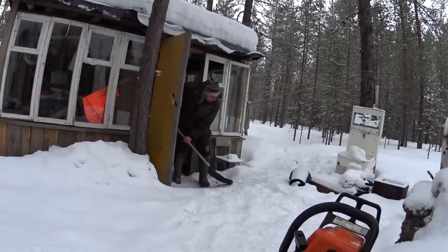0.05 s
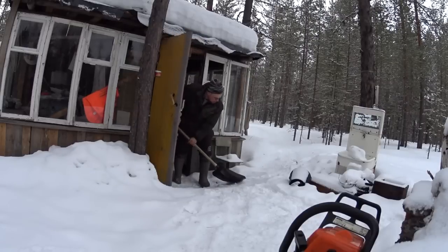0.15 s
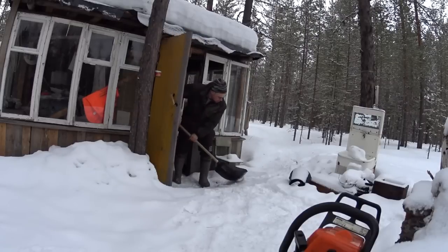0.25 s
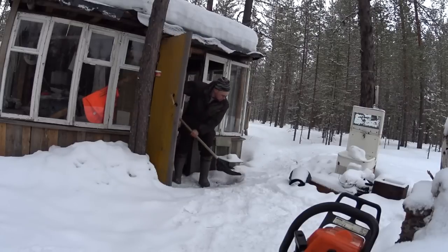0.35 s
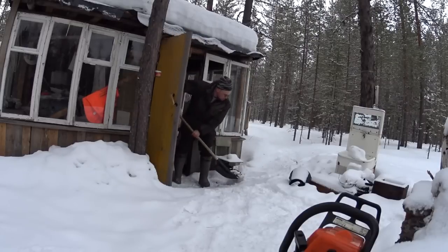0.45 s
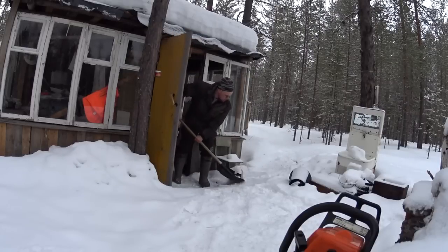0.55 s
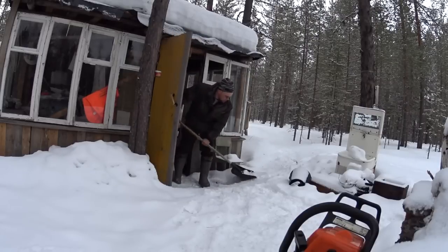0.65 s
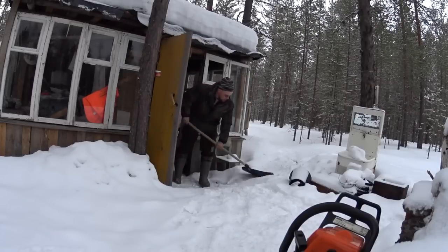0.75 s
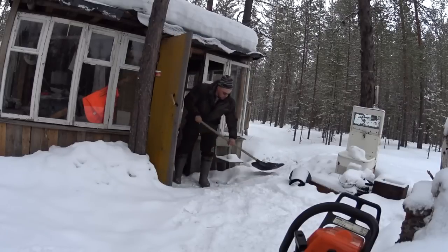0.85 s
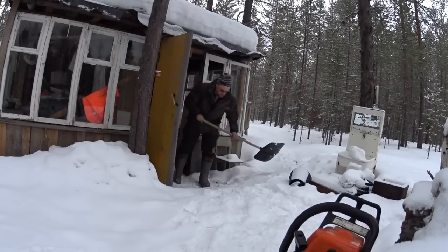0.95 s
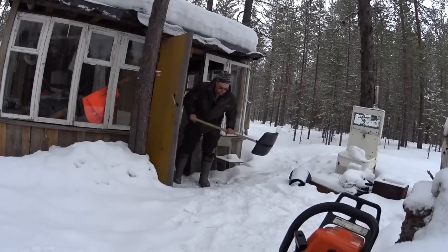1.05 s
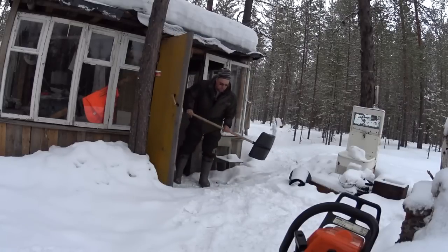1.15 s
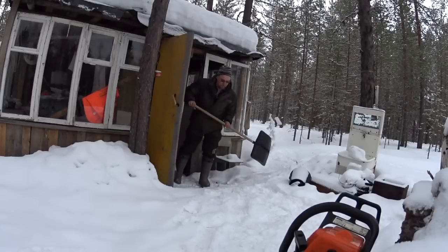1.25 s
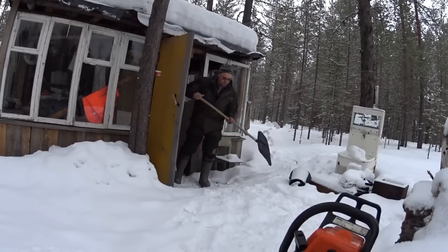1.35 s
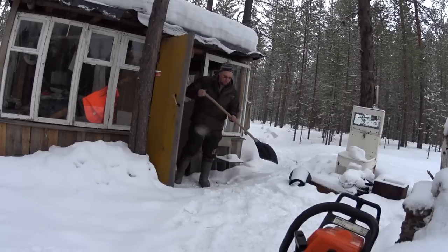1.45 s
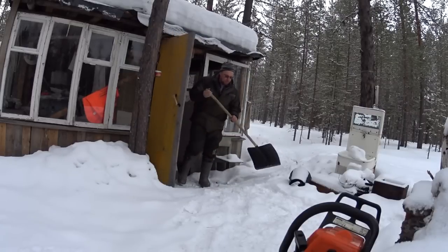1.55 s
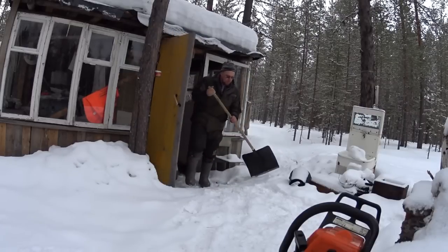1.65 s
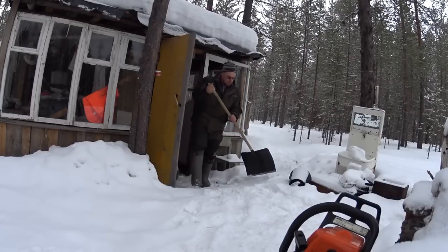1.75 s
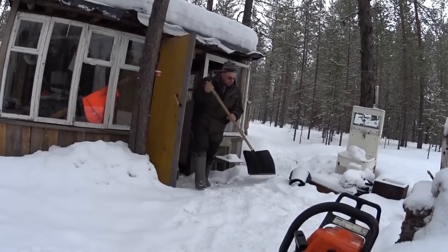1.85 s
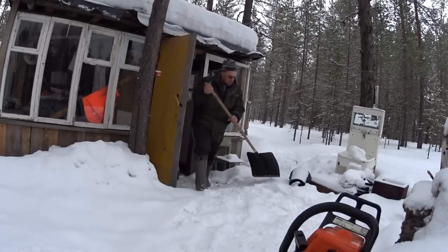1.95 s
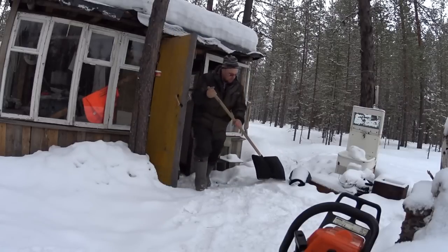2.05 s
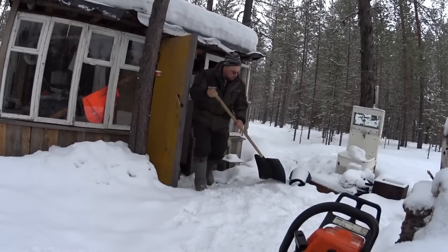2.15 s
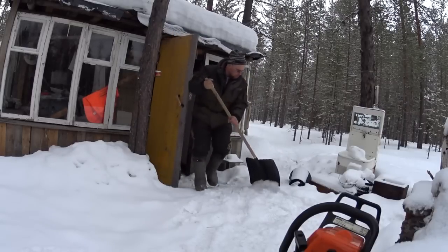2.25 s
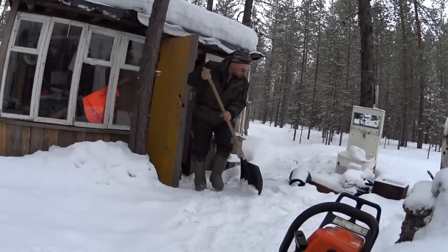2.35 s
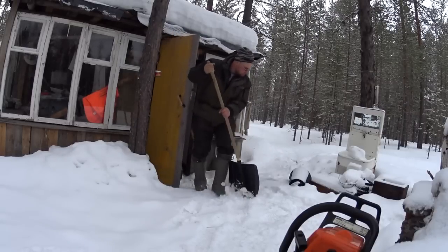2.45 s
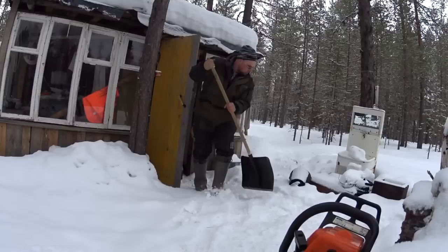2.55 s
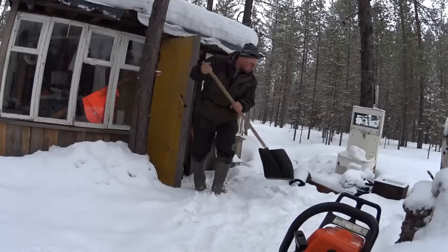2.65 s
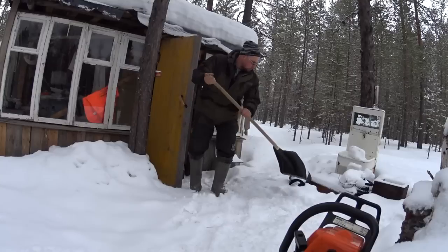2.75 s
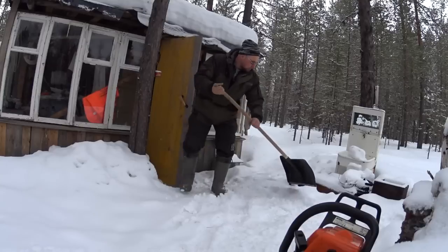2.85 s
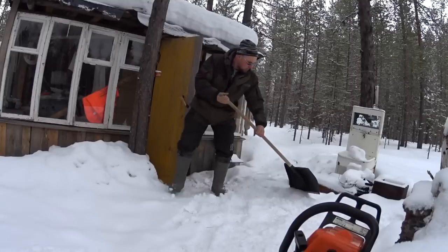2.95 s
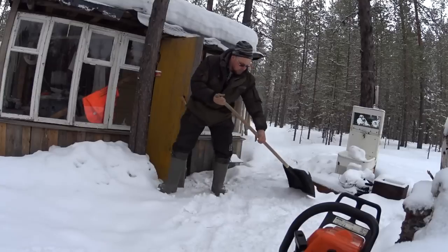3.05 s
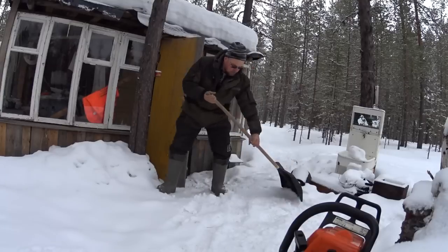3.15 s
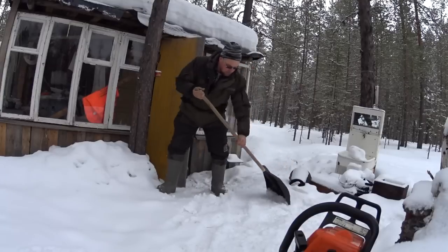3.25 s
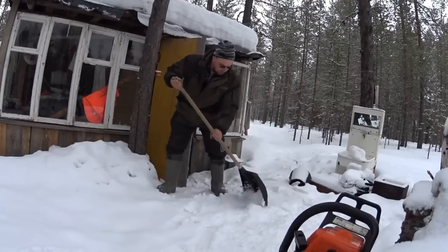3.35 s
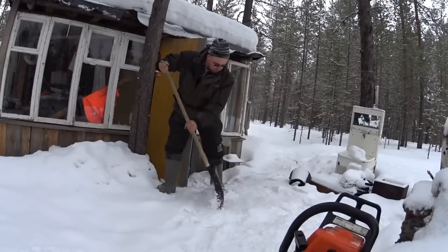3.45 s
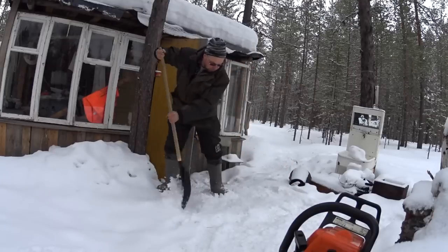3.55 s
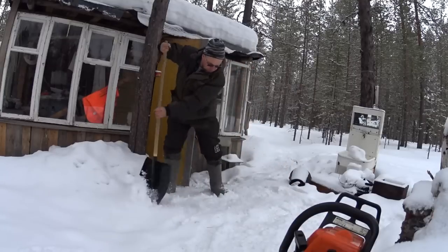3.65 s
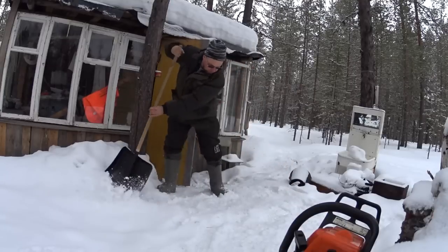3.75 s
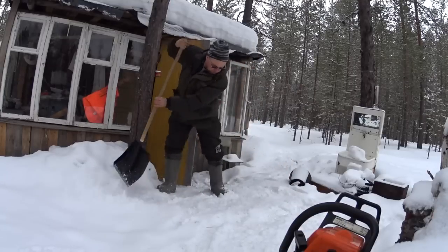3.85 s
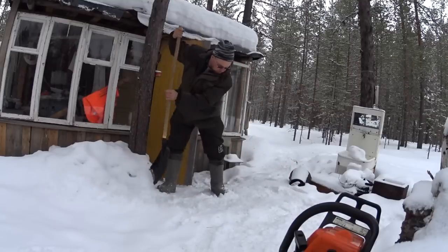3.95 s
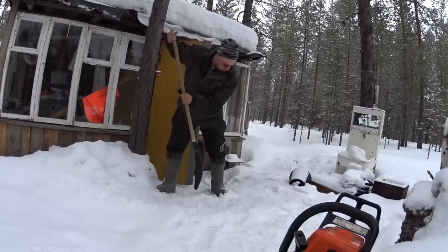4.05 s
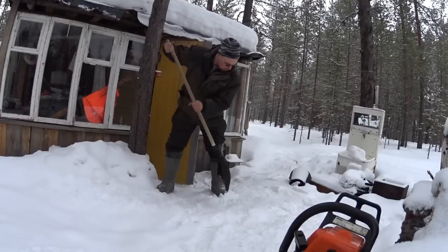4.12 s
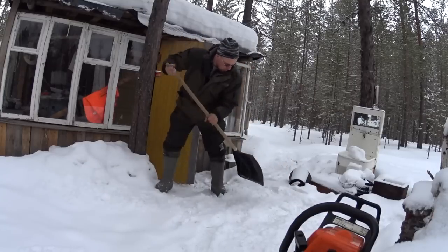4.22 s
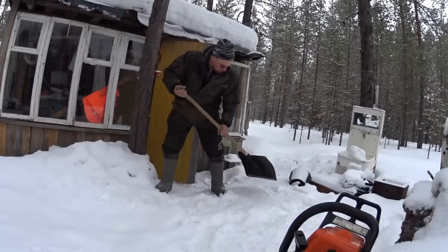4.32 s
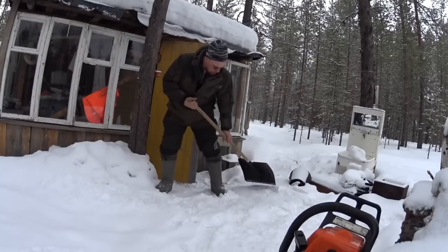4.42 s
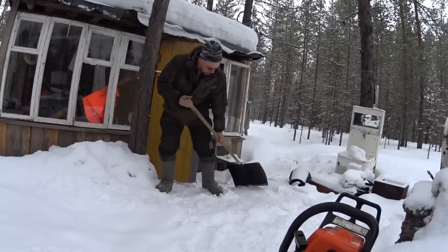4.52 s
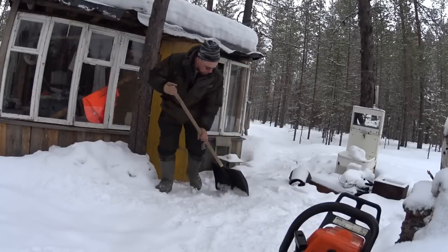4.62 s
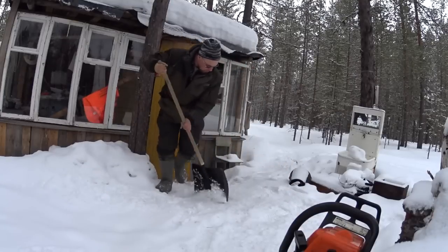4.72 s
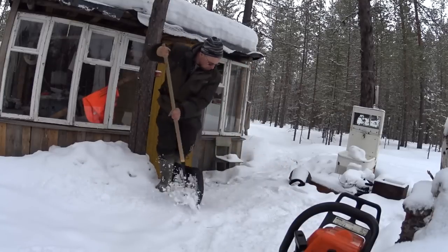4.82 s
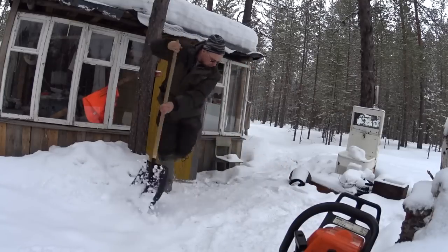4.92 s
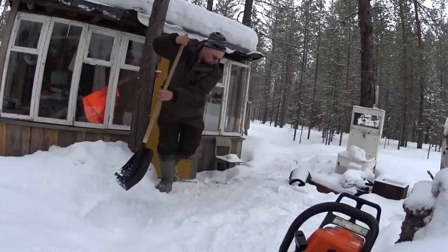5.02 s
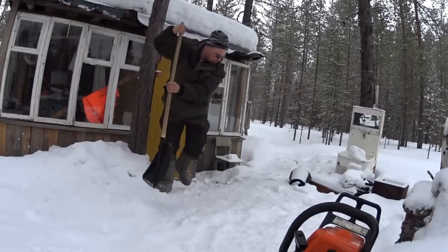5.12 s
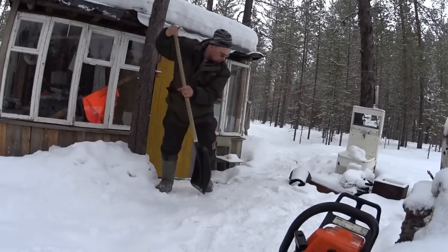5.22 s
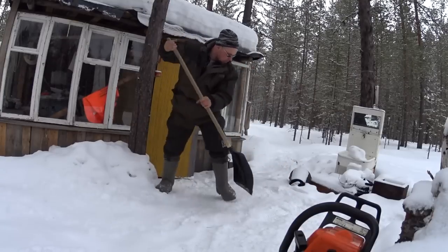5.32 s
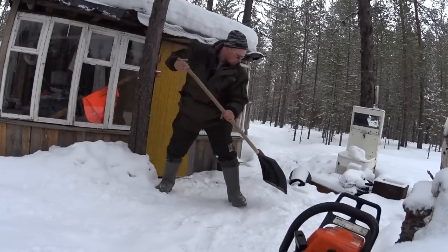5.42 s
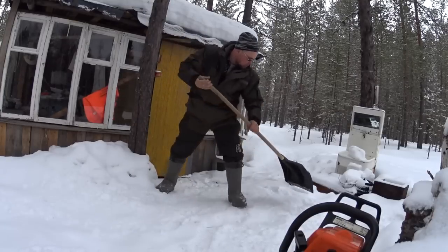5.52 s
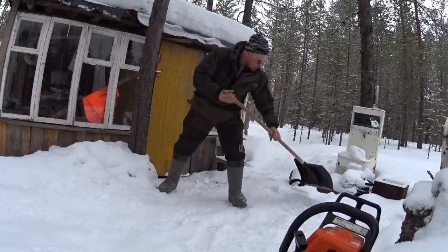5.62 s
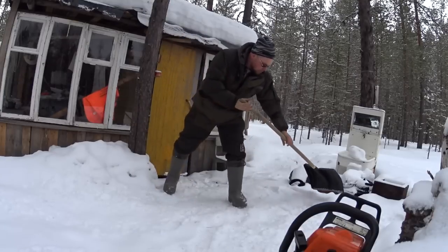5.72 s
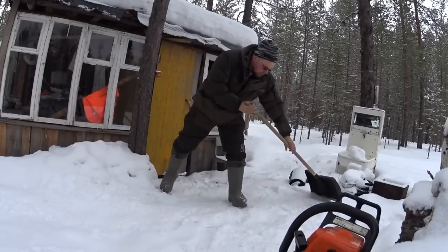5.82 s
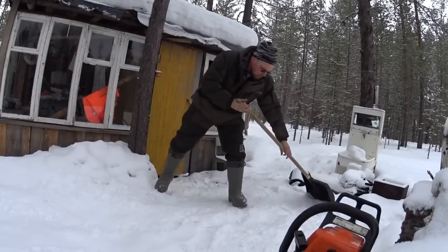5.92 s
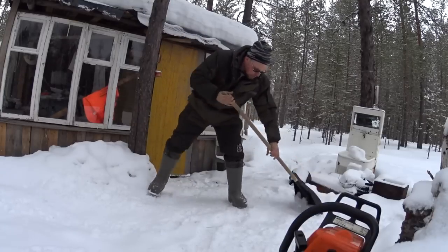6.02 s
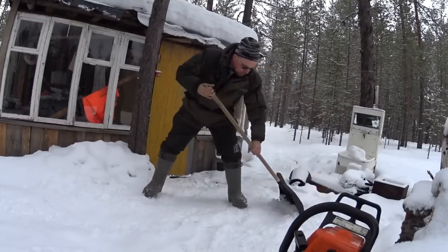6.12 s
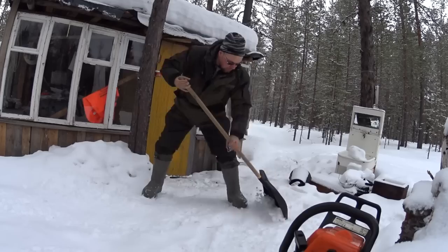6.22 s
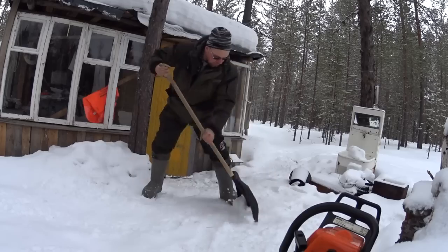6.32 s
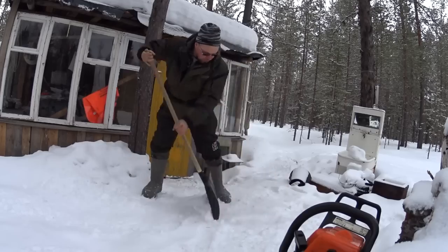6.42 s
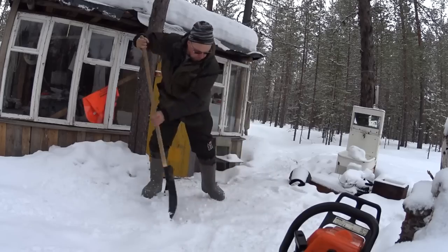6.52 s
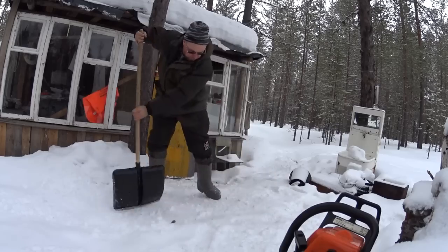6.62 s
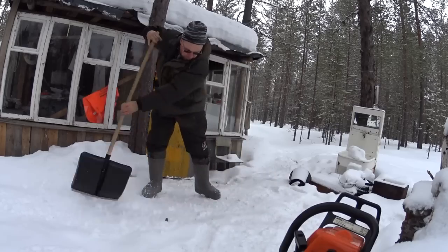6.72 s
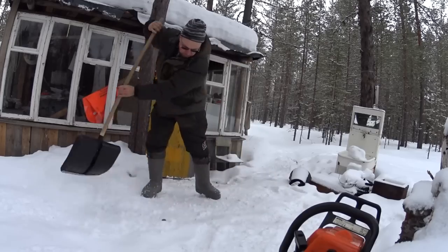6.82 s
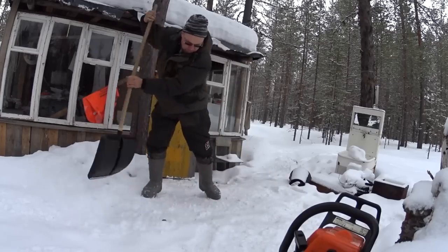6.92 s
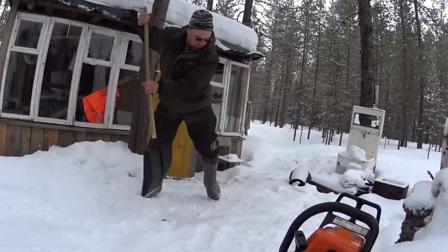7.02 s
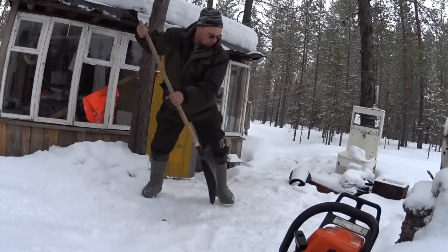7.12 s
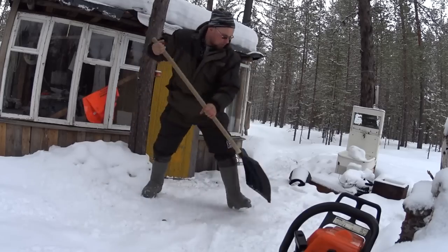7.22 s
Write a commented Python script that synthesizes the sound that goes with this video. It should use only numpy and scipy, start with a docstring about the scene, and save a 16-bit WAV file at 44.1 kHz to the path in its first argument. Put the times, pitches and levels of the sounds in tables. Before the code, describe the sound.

A plastic shovel scrapes and crunches through packed snow in long uneven strokes, with dull boot and blade knocks and snapping ice crumbs in a quiet forest.

```python
"""Shovelling packed snow by a cabin

A plastic shovel drags over packed snow: the blade catches, crushes snow and skips in short slips. Each slip is
crackling noise that also shakes the scoop, ribs, rim and ground, made as resonances. Boots and blade knock
dully (damped tones), and single ice crumbs snap (very short tones with noise). A faint bright hiss that swells
now and then, wind with low rumbles, and forest air are shaped noise; fading noise bursts give the echoes."""
import sys
import numpy as np
from scipy import signal
from scipy.fft import rfft, irfft, next_fast_len
from scipy.io import wavfile
from scipy.ndimage import uniform_filter1d

SR = 44100
rng = np.random.default_rng(int(sys.argv[2]) if len(sys.argv) > 2 else 0)


def unload_wav(signal):
    """Save mono or channel-first audio to the path in sys.argv[1] as 16-bit WAV at rate SR, clipped to [-1, 1]."""
    wavfile.write(
        sys.argv[1],
        SR,
        np.round(np.clip(np.atleast_2d(signal).T, -1, 1) * 32767).astype(np.int16),
    )


N = 320607  # length in samples

# Levels in the tables are settings; some layers are trimmed by a few dB when they are mixed.
# slips of the blade: [start t/s, swell t/ms, lets go after t/ms, time to fall 60 dB t/ms,
# crunch level/dB, load on the blade over the crunch level/dB]
BLADE_SLIPS = [(0.0, 37, 37, 166, -35, 0), (0.073, 15, 39, 160, -33.5, -4), (0.14, 5, 34, 320, -56, 7.5),
               (0.213, 28, 28, 98, -39.5, 2), (0.267, 25, 24.6, 52, -39, -7),
               (0.546, 34, 46.3, 74, -34, -1), (0.618, 5, 4, 88, -33.5, -4.5),
               (0.755, 3.9, 28, 117, -35.5, -1), (0.794, 7.6, 11, 19, -38.5, -2),
               (0.91, 33, 78, 310, -54.5, -18), (1.589, 1, 1, 69, -42, -15),
               (1.68, 8.3, 14, 111, -31.5, -0.5), (2.028, 7.7, 6.4, 113, -30, 4.5),
               (2.095, 1, 41, 86, -55, 2), (2.145, 1.4, 1, 160, -48, 4.5),
               (2.209, 7.3, 20.5, 39, -31, -6.5), (2.235, 16, 36.4, 106, -26, -5),
               (2.322, 12.5, 8, 77, -17.5, 0.5), (2.413, 19.7, 19, 107, -26.5, -0.5),
               (2.928, 6.2, 14.8, 22, -25, -7.5), (2.951, 6, 32.6, 71, -33, -0.5),
               (2.983, 42, 104, 240, -43.5, 3), (3.084, 29, 34, 90, -32.5, -4),
               (3.161, 10.6, 8.4, 67, -28.5, -10), (3.204, 3.5, 6.9, 52, -29, -1.5),
               (3.22, 3.2, 21, 95, -30.6, 5.5), (3.263, 33.5, 30.7, 75, -28.5, 6),
               (3.272, 1.3, 2.7, 40, -30, 8), (3.314, 7, 14.2, 91, -23.5, -2.5),
               (3.371, 10, 11, 167, -28, -2.5), (3.392, 9.3, 8.5, 42, -24, -2.5),
               (3.411, 2.1, 2, 110, -26.5, 2.5), (3.433, 5.7, 4.5, 112, -22, -6.5),
               (3.452, 1.4, 1, 89, -23, 6), (3.501, 9, 17.5, 107, -25.5, -6),
               (3.578, 18, 7.5, 296, -21.5, 1.5), (3.641, 26, 20, 100, -23, 0),
               (3.702, 1.4, 1, 164, -30, -11), (3.72, 2.6, 8.4, 60, -29.5, -1),
               (3.752, 39, 49, 110, -44, -29), (3.809, 15, 15, 110, -49, -31),
               (4.386, 32, 31, 70, -47.5, 10.5), (4.425, 3, 3, 91, -30.5, 0),
               (4.438, 4.4, 32.4, 83, -34.5, 4.5), (4.499, 48, 47.7, 83, -22.5, 1.5),
               (4.507, 2.4, 4.2, 41, -28, 2), (4.602, 9, 6, 107, -23.5, 6.5),
               (4.617, 10.3, 11.4, 79, -25.5, 3.5), (4.651, 16.5, 14.3, 18, -22.5, -4),
               (4.669, 13.6, 24, 73, -26.5, 6.5), (4.717, 41, 35, 42, -22.5, 1.5),
               (4.754, 7, 9.4, 128, -26.5, 0), (4.788, 7, 5.6, 74, -20, -2.5),
               (4.854, 5.5, 9.6, 49, -26.5, 9.5), (4.867, 10.6, 10.4, 86, -25, -2),
               (5.361, 29, 26, 140, -45, -14), (5.727, 6.9, 9.4, 42, -40, 5), (5.733, 20, 140, 360, -49, 6),
               (5.793, 2.5, 2, 94, -26, -4), (5.86, 1, 24, 137, -33, 2.5),
               (5.921, 10.6, 14.3, 88, -26.5, -0.5), (5.989, 8.6, 39, 47, -31.5, 3),
               (6.038, 14, 32, 67, -37, 4), (6.09, 9.8, 25.7, 27, -29, -0.5),
               (6.119, 0.87, 1, 330, -24, 2.5), (6.168, 5, 33.7, 26, -27, -1.5),
               (6.236, 12, 13.4, 140, -25, -7), (6.258, 7.5, 8.3, 57, -22, -2.5),
               (6.278, 1.8, 20.4, 120, -25, -8), (6.315, 1.5, 2, 205, -27.5, 3.5),
               (6.337, 1, 16, 120, -32.5, 2), (6.386, 3.6, 25.4, 73, -24.5, -5.5),
               (6.429, 13, 33.6, 133, -26.5, -3), (6.482, 3, 11, 69, -29.5, -21),
               (6.514, 11, 13, 170, -25.5, 1), (6.534, 20, 61, 51, -25.5, 5),
               (6.645, 13, 38, 100, -44.5, -10), (6.693, 7.5, 4, 150, -42, -37),
               (6.731, 1.1, 1, 112, -48, -14), (7.236, 16, 42, 60, -56, 3)]
# dull knocks of boots and blade: [t/s, peak level/dB, pitch f/Hz, slap relative to the peak level/dB]
DULL_KNOCKS = [(0.014, -25.5, 480, -7), (0.094, -18, 592, -22), (0.222, -35, 410, -1),
               (1.148, -40.5, 305, -10), (1.326, -29, 223, -22), (1.375, -37, 229, -22),
               (1.858, -15.5, 198, -1), (1.953, -35, 212, -1), (1.974, -37, 324, -5), (1.999, -38, 477, 5),
               (2.147, -38, 290, 12.5), (2.274, -13, 392, 2), (2.531, -33.5, 253, -9), (2.545, -38, 186, 4),
               (2.565, -28.5, 587, 0), (2.605, -35, 293, -12), (3.092, -20, 393, -7),
               (3.335, -17.5, 410, -5), (3.666, -19, 370, -11), (4.314, -37.5, 435, 8),
               (4.339, -42, 510, -3), (4.378, -44, 480, 11), (4.397, -26, 465, 5), (4.533, -17, 336, 9),
               (4.746, -6.5, 283, -11), (4.796, -13, 537, -21), (4.857, -16.5, 394, 6),
               (5.347, -25.5, 487, 4.5), (5.391, -37, 433, 0), (5.453, -39, 420, 8.5),
               (5.709, -21.5, 355, -22), (5.797, -27.5, 507, 11.5), (6.142, -11.5, 360, -14),
               (6.563, -9, 292, 0), (6.577, -31, 389, -13), (7.173, -49, 501, 10)]
# low resonances of the scoop: [centre f/Hz, width f/Hz, level/dB]
SCOOP_MODES = [(182.5, 39, -4.5), (283.4, 36, 0), (388.4, 53.7, 3), (476, 83, -6)]
# resonances of the rim: [centre f/Hz, width f/Hz, level/dB]
RIM_MODES = [(1051, 135, -2.5), (1385, 185, 4), (1648, 280, -3)]
# resonances of the ribbed back: [centre f/Hz, width f/Hz, level/dB]
RIB_MODES = [(594, 160, -1), (756, 78, 1), (930, 120, -9)]
# packed snow giving under the load: [centre f/Hz, width f/Hz, level/dB]
GROUND_MODES = [(47.3, 32, -2.5), (135, 42, 11.5)]
# tone colour of breaking crystals: [f/Hz, level/dB]
CRUNCH_COLOUR = [(1060, -16), (1800, 1.5), (2570, -2.5), (2810, -3.5), (3700, -3.5), (4370, -5), (4850, -4),
                 (5910, -4), (7310, -8.5), (8760, -19), (10500, -12), (11000, -7.5), (14300, -41),
                 (22000, -120)]
# tone colour of the faint swelling hiss: [f/Hz, level/dB]
HISS_COLOUR = [(710, -21), (1200, 1), (1680, -2), (2110, -4), (2500, 0), (4960, 0.5), (6310, 0),
               (11000, -7), (14300, -44), (22000, -120)]
# tone colour of the low noise, wind and rumbles: [f/Hz, level/dB]
LOW_COLOUR = [(15, -13), (40, 3), (130, 1.5), (300, -5), (700, -60)]
# tone colour of the forest air: [f/Hz, level/dB]
AIR_COLOUR = [(60, -34), (200, -0.5), (500, 3), (1200, -5), (3000, -17), (8000, -32)]
# tone colour of the crumbling after a knock: [f/Hz, level/dB]
CLOD_COLOUR = [(60, -24), (200, 4), (500, -5.5), (1200, -20), (3000, -41)]
# sound scattered off the snow bank: [f/Hz, side relative to middle level/dB]
BANK_WIDTH = [(100, -14.5), (400, -16.5), (1500, -11.5), (5000, -14.5), (10000, -11)]
# how long the yard rings, before each echo takes its share: [f/Hz, time to fall 60 dB t/s]
YARD_RING = [(150, 0.098), (700, 0.31), (3000, 0.36), (10000, 0.45)]
# partials of a knock: [multiple of the pitch, level/dB]
KNOCK_PARTIALS = [(1, 3), (1.7, -3.5), (3.3, -17.5), (5.4, -9)]
# single ice crumbs snapping: [t/s, peak level/dB, centre f/Hz]
CRUMB_TICKS = [(0.879, -42, 7150), (0.975, -34, 6360), (1.061, -45, 5500), (1.273, -53, 4110),
               (1.956, -37, 4300), (1.999, -45, 2170), (2.3273, -31, 5030), (2.5676, -47, 2260),
               (2.899, -43, 3360), (3.321, -19, 1950), (3.584, -13.5, 2040), (3.79, -34.5, 4200),
               (4.2547, -45, 2310), (4.324, -42, 3670), (4.397, -47, 2410), (4.4099, -30.5, 3440),
               (4.5092, -21, 2000), (4.6078, -8.5, 4920), (4.63, -16, 4780), (4.7456, -19, 2580),
               (4.7932, -9, 5800), (4.86, -16, 5100), (5.2477, -37.5, 7100), (5.346, -37, 3360),
               (5.659, -42, 2400), (5.7356, -25, 5640), (5.7537, -37, 2860), (5.7977, -17, 2160),
               (5.808, -38, 2480), (5.8164, -24, 6400), (5.8302, -23, 4550), (6.679, -39, 5070),
               (6.6982, -25.5, 7000), (6.7325, -32.5, 6100)]
# swells of the faint hiss: [fullest at t/s, level/dB]
HISS_SWELLS = [(0.3, -69), (0.85, -57), (1.76, -61.5), (2.5, -67.5), (4.03, -62.5), (4.2, -57.5),
               (4.96, -60), (5.3, -62.5), (5.69, -61.5), (6.92, -59), (7.2, -60)]
# low rumbles that start suddenly and die away: [t/s, level/dB]
LOW_RUMBLES = [(0.222, -46), (0.38, -55), (0.48, -57), (1.96, -58), (2.49, -53.5), (5.36, -56), (5.71, -43),
               (6.78, -62)]
# long sweeps from the right to the centre: [start t/s, end t/s]
LONG_STROKES = [(2.93, 3.9), (4.39, 4.6), (5.75, 6.85)]
# level of the ribs' ringing over time, added to what the load gives: [t/s, level/dB]
RIB_LEVEL = [(0.0, 4), (0.3, 9), (0.6, 3.5), (0.78, 0), (1.68, 3.5), (2.25, -0.5), (2.95, 4.5), (3.1, 3),
             (3.29, -3), (3.44, 2), (3.52, -1), (3.65, 4.5), (4.4, 0), (4.8, 0.5), (5.75, -0.5),
             (6.0, -7.5), (6.14, 1.5), (6.26, 1), (6.52, 6), (6.6, 0.5)]

RIBS_FEEL, RIM_FEEL = 0.48, 0.19  # share of the load in dB that reaches ribs and rim; the scoop takes it all
KNOCK_T60_S, HARD_RINGS = 0.063, 0.00077  # ring of a knock listed at -20 dB; seconds gained per dB
CRUMBLE_DB, CRUMBLE_GROWS = -35.5, 0.82  # crumbling after a knock listed at -21.5 dB; dB gained per dB
HISS_RISE, HISS_FALL, HISS_DB = 36, 64, -68  # dB a second before and after the peak; steady level in dB
RUMBLE_RISE, RUMBLE_FALL, WIND_DB = 1700, 94, -73.5  # dB a second before and after; steady wind level in dB
AIR_DB = -60  # steady level of the forest air
START_PAN_DB, END_PAN_DB, REST_PAN_DB = -2.5, 0, -0.8  # left over right; below zero is to the right
TOP_HZ = 11030  # hardly anything sounds above this


def amp(db):
    """Turn a level in dB into a gain."""
    return 10 ** (np.asarray(db) / 20)


def unit(x):
    """Scale x to an average (rms) strength of 1."""
    return x / np.sqrt(np.mean(x ** 2) + 1e-20)


def along(points, hz):
    """Read a value between (Hz, value) points, with pitch spaced as the ear hears it (log)."""
    f, value = np.transpose(points)
    return np.interp(np.log(hz + 1), np.log(f + 1), value)


def filtered(x, response):
    """Make each frequency of x stronger, weaker or shifted in phase, as response says."""
    size = next_fast_len(N + SR // 2)
    hz = np.fft.rfftfreq(size, 1 / SR)
    return irfft(rfft(x, size) * response(hz), size)[..., :N]


def coloured(x, points):
    """Give x the tone colour of a table of (Hz, dB)."""
    return filtered(x, lambda hz: amp(along(points, hz)))


def modes(table):
    """Resonances side by side: each rings at its centre, and a wider one dies sooner."""
    def response(hz):
        total = 0
        for k, (centre, width, db) in enumerate(table):
            damping = 1j * hz * width
            total = total + (-1) ** k * amp(db) * damping / (centre ** 2 - hz ** 2 + damping)
        return total
    return response


def patchy(x, depth_db, size=256, bins=5, frames=5):
    """Give x smooth random patches of louder and softer over time and frequency."""
    z = signal.stft(x, nperseg=size)[2]
    field = uniform_filter1d(rng.standard_normal(z.shape[-2:]), bins, 0)
    field = unit(uniform_filter1d(field, frames, 1))
    return unit(signal.istft(z * amp(depth_db * field), nperseg=size)[1][..., :N])


def flexing(x, depth_db):
    """The loaded blade bends: narrow bands of its sound come and go at random."""
    return patchy(x, depth_db, size=512, bins=2, frames=12)


def grains(rate, spread_db, share):
    """Breaking crystals: about rate uneven clicks a second, share of the power, on a bed of noise."""
    chance, sign, size = rng.random((3, N))
    heights = amp(-spread_db * np.log(size + .03))  # many small clicks, a few big ones
    clicks = (chance < rate / SR) * np.sign(sign - .5) * heights
    share = np.clip(share, 0, 1)
    return np.sqrt(share) * unit(clicks) + np.sqrt(1 - share) * rng.standard_normal(N)


def swells(peaks, rise, fall, steady_db):
    """Gain of a steady level with peaks that climb and sink at so many dB a second."""
    peak_s, peak_db = np.array(peaks)[:, :1], np.array(peaks)[:, 1:]
    late = np.arange(N) / SR - peak_s
    levels_db = peak_db + np.minimum(rise * late, -fall * late)
    return np.sqrt(amp(steady_db) ** 2 + np.sum(amp(levels_db) ** 2, axis=0))


def bed(colour, alike, depth_db):
    """Wide stereo noise; alike says how much left and right match (1 is the same, 0 unrelated)."""
    turn = np.arccos(np.clip(alike, -1, 1)) / 2
    mid, side = coloured(patchy(rng.standard_normal((2, N)), depth_db), colour)
    return unit(np.cos(turn) * mid + np.sin(turn) * np.array([side, -side]))


def forest_air():
    """The air of the forest hushes from all sides as steady, nearly unrelated noise left and right."""
    return amp(AIR_DB) * bed(AIR_COLOUR, 0.038, depth_db=2.0)


def wind_and_rumbles():
    """A steady low wind noise, with low rumbles that start suddenly and die away."""
    gain = swells(LOW_RUMBLES, RUMBLE_RISE, RUMBLE_FALL, WIND_DB)
    return gain * bed(LOW_COLOUR, 0.95, depth_db=2)


def faint_hiss():
    """A faint bright hiss that swells now and then."""
    gain = swells(HISS_SWELLS, HISS_RISE, HISS_FALL, HISS_DB)
    return gain * bed(HISS_COLOUR, 0.79, depth_db=1.0)


def tail(seconds, t60_share):
    """A fading burst of noise for each ear, where each frequency dies at its own speed."""
    noise = rng.standard_normal((2, round(seconds * SR)))
    hz, t, z = signal.stft(noise, SR, nperseg=128)
    t60 = t60_share * along(YARD_RING, hz)[:, None]
    out = signal.istft(z * amp(-60 * t / t60), SR, nperseg=128)[1]
    return out / np.linalg.norm(out[0])  # total energy 1 on the left


def echoes(x, seconds, t60_share, delay):
    """Scattered echoes that change as the shovel moves: a new burst every tenth of a second."""
    out, step = np.zeros((2, N + SR)), SR // 10
    for at in range(0, N, step):
        wet = signal.fftconvolve(x[None, at:at + step], tail(seconds, t60_share), axes=1)
        out[:, at + delay:at + delay + wet.shape[1]] += wet
    return out[:, :N]


def ticks():
    """A crumb snaps: two or three cycles of a tone and a spit of noise."""
    out, t = np.zeros(N + SR), np.arange(SR // 50) / SR
    spits = rng.standard_normal((len(CRUMB_TICKS), len(t)))
    for (s, db, hz), noise in zip(CRUMB_TICKS, spits):
        tone = amp(-60 * t * hz / 14) * np.sin(2 * np.pi * hz * t)  # falls 60 dB in 14 cycles
        spit = amp(-60 * t / 0.0062) * np.diff(noise, prepend=0) / 2
        out[round(s * SR):][:len(t)] += amp(db + 3.0) * (tone + 0.18 * spit)
    return out[:N]


def knocks():
    """Each knock slaps, rings a few damped cycles, high partials dying first, and leaves clods crumbling."""
    out, loose, t = np.zeros(N + SR), np.zeros(N + SR), np.arange(SR // 4) / SR
    # about one cycle of flat contact
    slap = np.exp(-((t - .0015) / 0.00043) ** 2) * np.sin(2 * np.pi * 850 * (.0015 - t))
    for s, db, hz, slap_db in DULL_KNOCKS:
        t60 = max(KNOCK_T60_S + HARD_RINGS * (db + 20), .01)  # harder knocks ring longer
        ring = np.zeros(len(t))
        for multiple, level in KNOCK_PARTIALS:
            fade = amp(level - 60 * t * multiple ** 1.1 / t60)
            ring += fade * np.sin(2 * np.pi * multiple * hz * t)
        ring *= (1 - np.exp(-t / 0.00031)) ** 2  # soft start
        at = round(s * SR)
        out[at:at + len(t)] += amp(db - 3.0) * (ring / np.abs(ring).max() + amp(slap_db) * slap)
        crumble_db = CRUMBLE_DB + CRUMBLE_GROWS * (db + 21.5)
        loose[at:at + len(t)] += amp(crumble_db - 60 * t / 0.15) * (1 - np.exp(-t / 0.0009))
    clods = unit(coloured(grains(300, 4.7, 0.5), CLOD_COLOUR))
    thud = out[:N] + loose[:N] * clods
    return filtered(thud, lambda hz: (1j * hz / (110 + 1j * hz)) ** 2)  # a small object radiates no deep bass


def contact():
    """Strength of the slips on crystals, scoop, ribs and rim: a swell, then a steady fall in dB."""
    power, ms = np.zeros((4, N + SR)), np.arange(SR // 2) / SR * 1000
    feel = np.array([0, 1, RIBS_FEEL, RIM_FEEL])
    for s, swell, release, t60, crunch_db, load_db in BLADE_SLIPS:
        rise = np.minimum(ms / max(swell, .5), 1)
        fall = amp(-60 * np.maximum(ms - release, 0) / max(t60, 10))
        gain = amp(crunch_db + feel * load_db)[:, None]
        at = max(round(s * SR), 0)
        power[:, at:at + len(ms)] += (gain * rise * fall) ** 2
    return np.sqrt(power[:, :N])


def scrape():
    """Crushed snow hisses and shakes scoop, ribs, rim and ground; bigger lumps snap through them all."""
    crunch, scoop, ribs, rim = contact()
    ribs = ribs * amp(np.interp(np.arange(N) / SR, *np.transpose(RIB_LEVEL)))
    snaps = grains(350, 6.0, 1)
    crystals = coloured(grains(2500, 8.1, 0.39), CRUNCH_COLOUR)
    hiss = patchy(flexing(crystals, depth_db=4.0), depth_db=1.0)
    hiss = hiss + amp(-12.0) * unit(coloured(snaps, CRUNCH_COLOUR))
    out = amp(0.05) * crunch * unit(hiss)
    # strength, resonances, level in dB, depth of the flexing in dB
    parts = ((scoop, SCOOP_MODES, 0.3, 1.6), (ribs, RIB_MODES, -2.5, 2.5),
             (rim, RIM_MODES, -4.5, 3.5), (scoop, GROUND_MODES, -14, 1.6))
    for force, table, db, flex_db in parts:
        shake = flexing(grains(1200, 3.8, 0.26), flex_db) + amp(-3.5) * snaps
        loudness = np.std(filtered(shake, modes(table)))  # so the level does not hang on the resonances
        out += amp(db) / loudness * filtered(force * shake, modes(table))
    return out


def sweep():
    """Left over right in dB: each long stroke glides from the right to the centre."""
    t, pan_db = np.arange(N) / SR, np.full(N, float(REST_PAN_DB))
    for start, end in LONG_STROKES:
        glide = np.interp(t, [start, end], [START_PAN_DB, END_PAN_DB])
        pan_db = np.where((t > start) & (t < end), glide, pan_db)
    return uniform_filter1d(pan_db, SR // 20)  # no sudden jumps


def scene():
    """The shovel works from right to centre; snow bank, cabin and trunks answer over the quiet forest."""
    background = forest_air() + wind_and_rumbles() + faint_hiss()
    work = ticks() + knocks() + scrape()
    cabin = amp(-21) * echoes(work, 0.2, 1, delay=SR // 150)
    # the snow bank scatters a little differently to each side
    bank = echoes(work, .04, 0.066, delay=0)[0]
    side = amp(0.5) * coloured(bank, BANK_WIDTH)
    pan_db = sweep()
    shovel = work * amp([pan_db / 2, -pan_db / 2])
    return shovel + np.array([side, -side]) + cabin + background


def record(dry):
    """A very steep filter takes away the top of the treble."""
    return filtered(dry, lambda hz: 1 / (1 + (hz / TOP_HZ) ** 240))


dry = scene()
out = record(dry)
unload_wav(out)
```